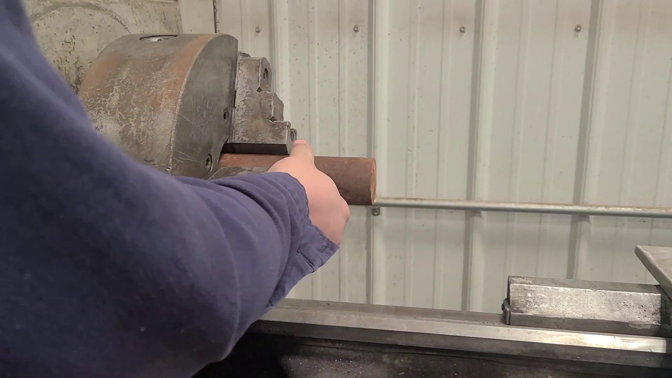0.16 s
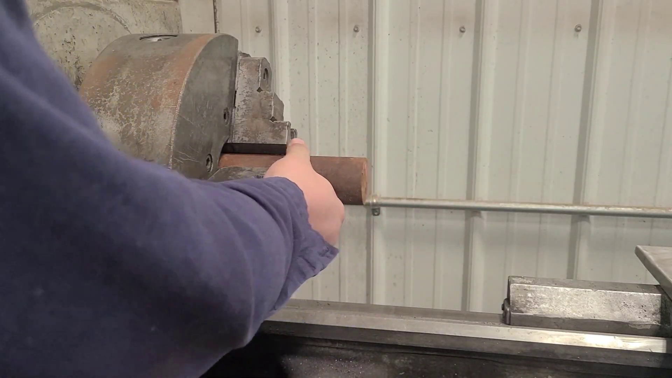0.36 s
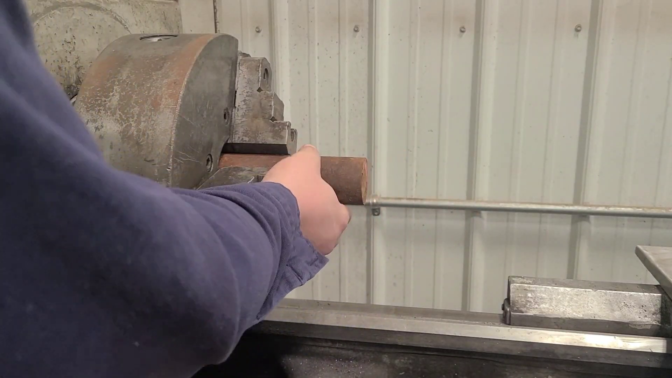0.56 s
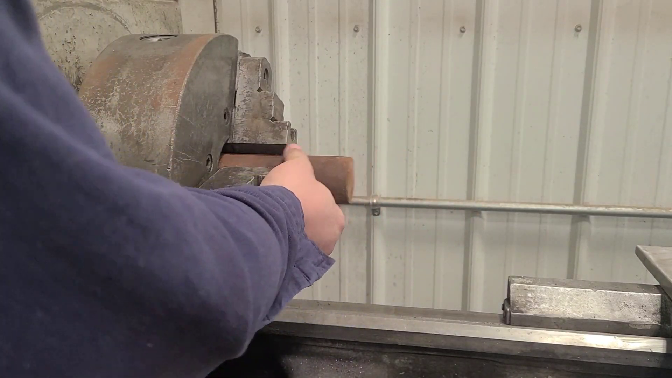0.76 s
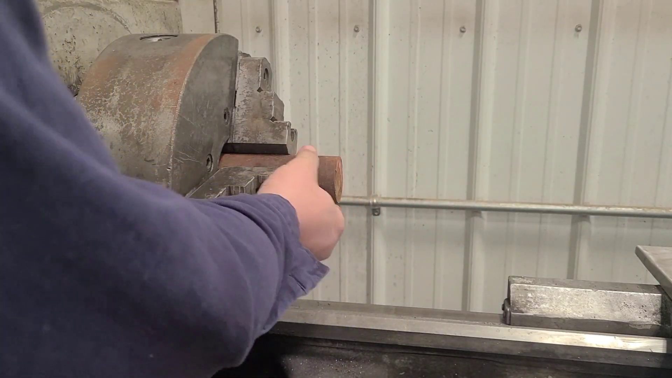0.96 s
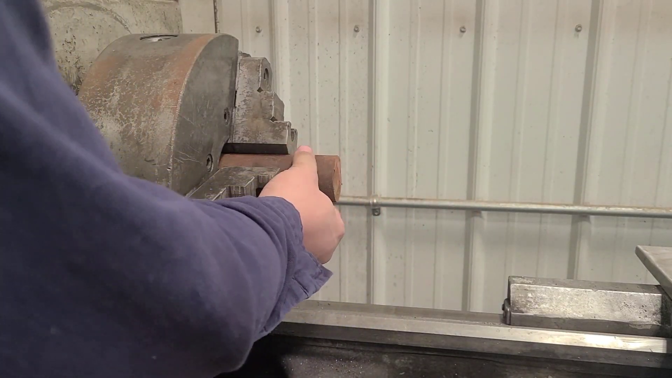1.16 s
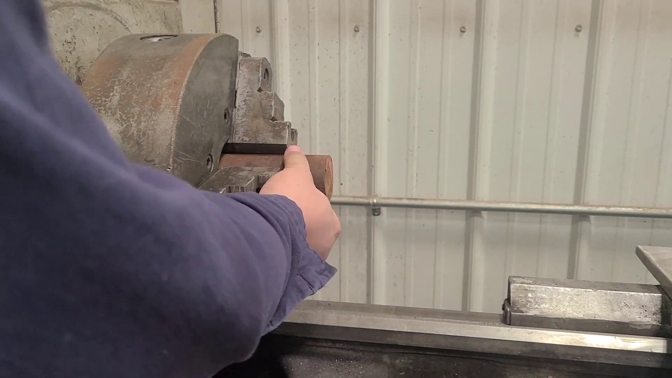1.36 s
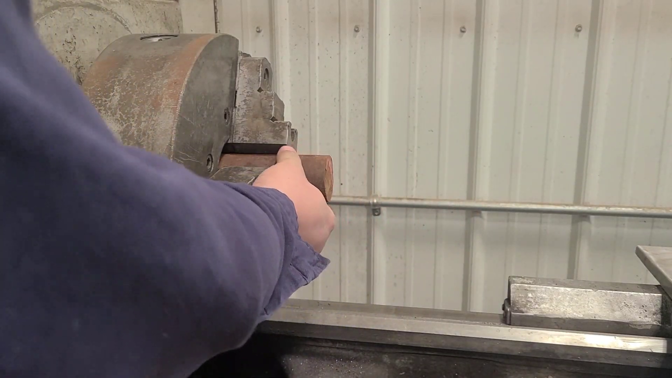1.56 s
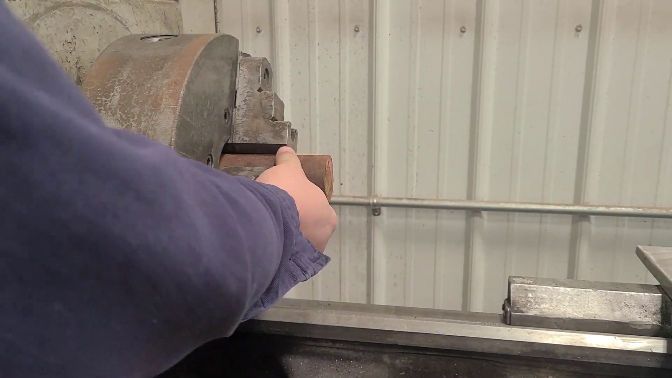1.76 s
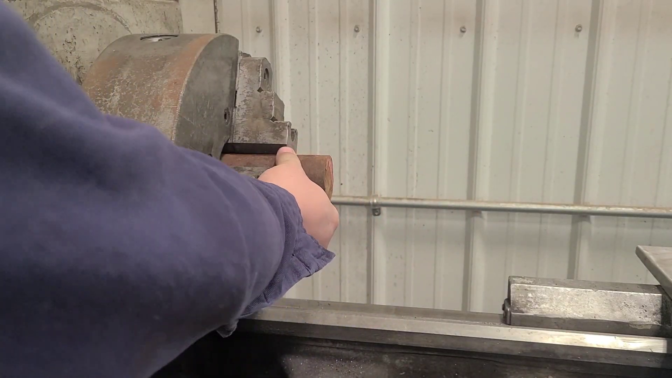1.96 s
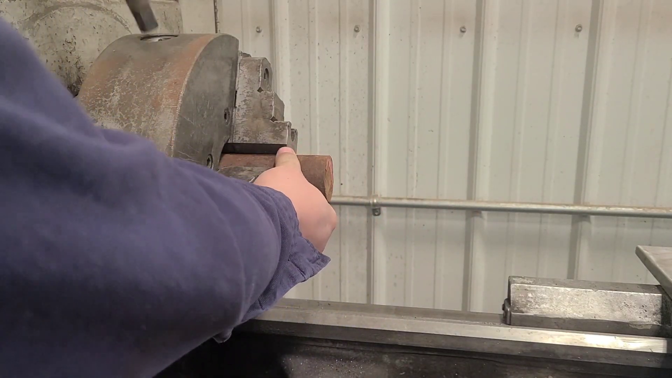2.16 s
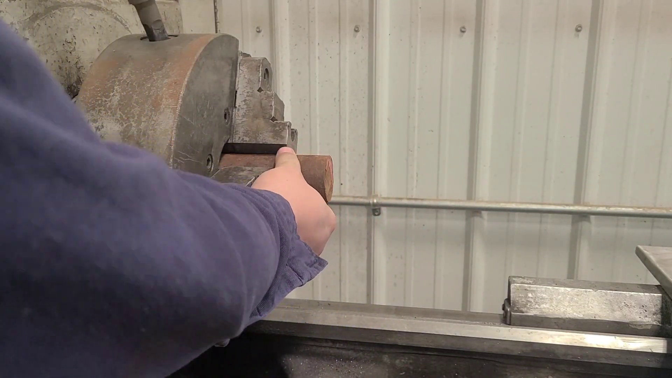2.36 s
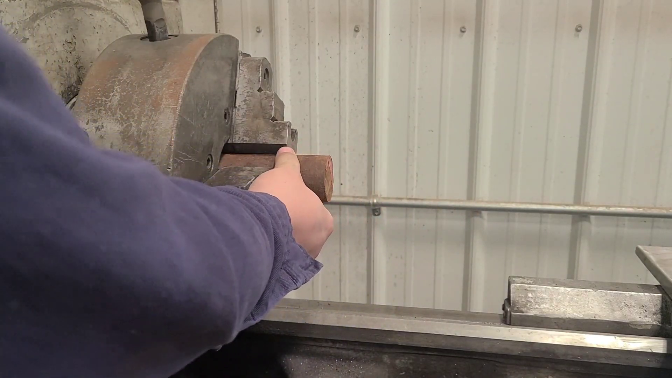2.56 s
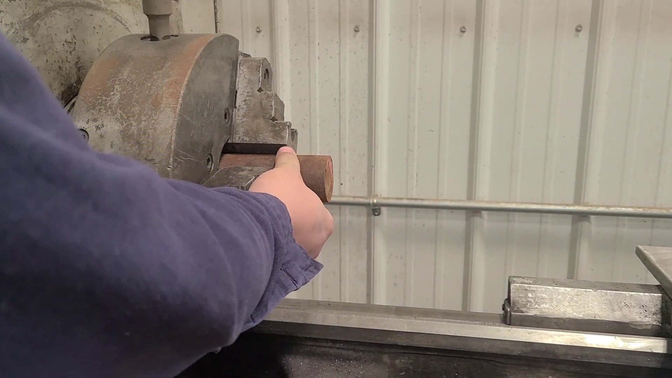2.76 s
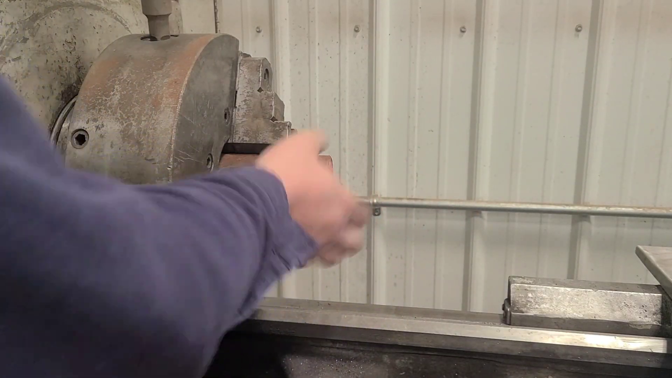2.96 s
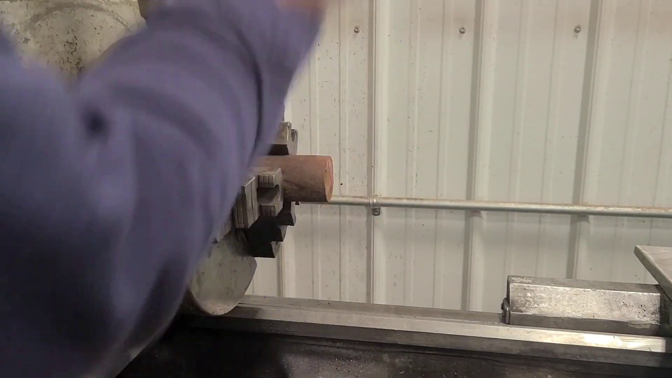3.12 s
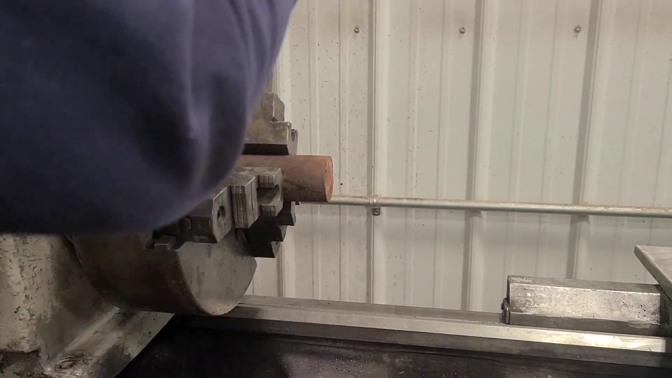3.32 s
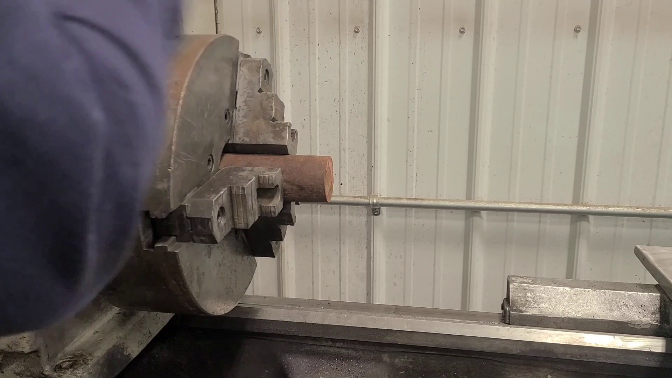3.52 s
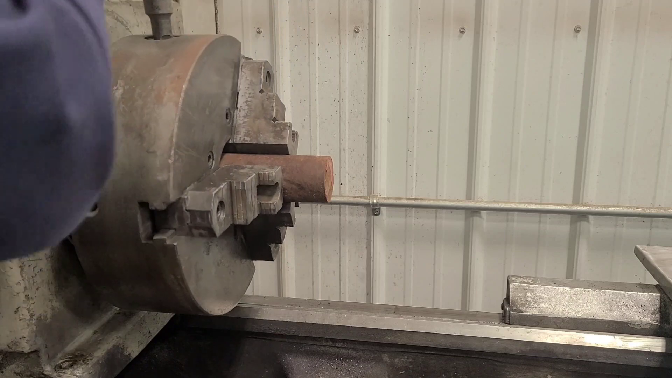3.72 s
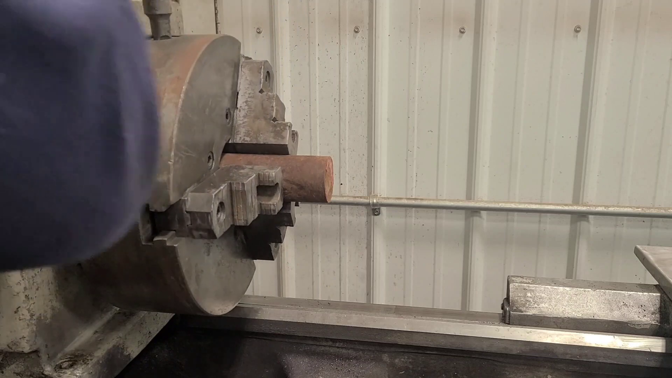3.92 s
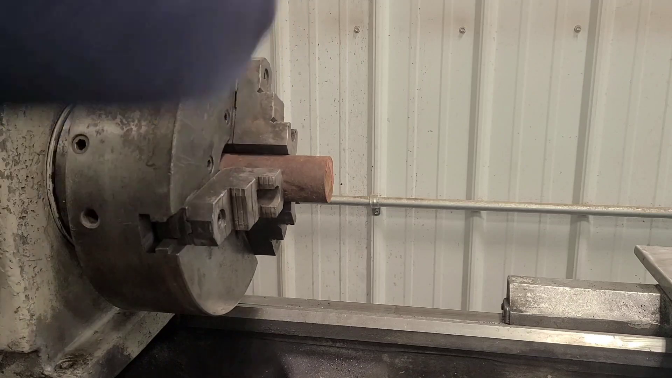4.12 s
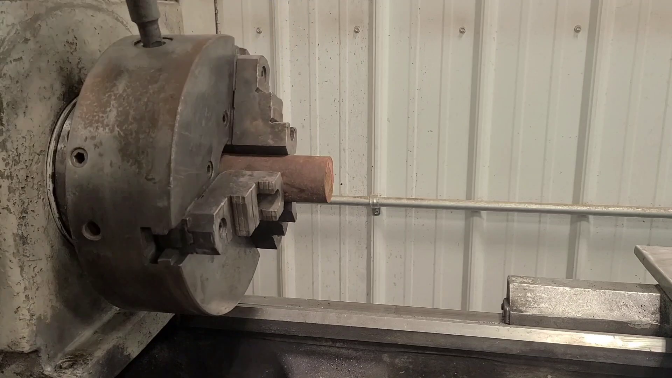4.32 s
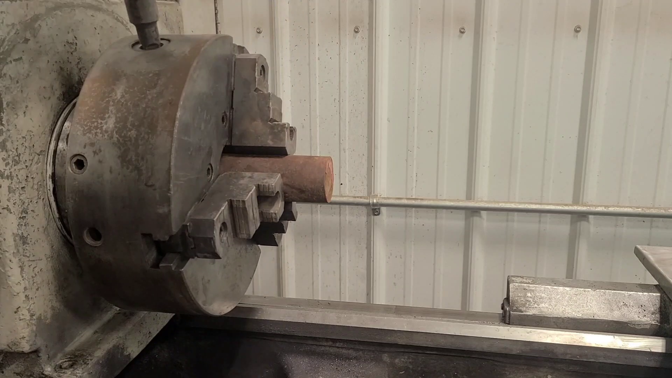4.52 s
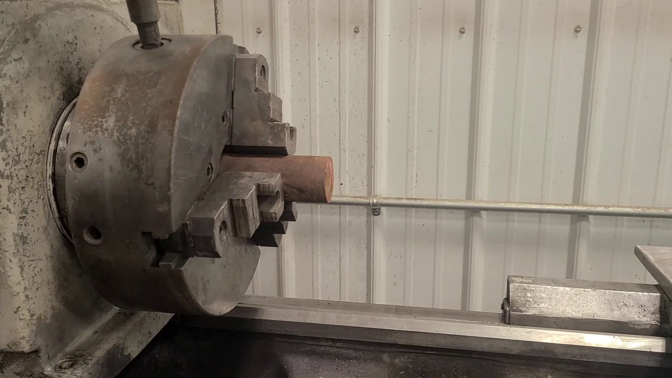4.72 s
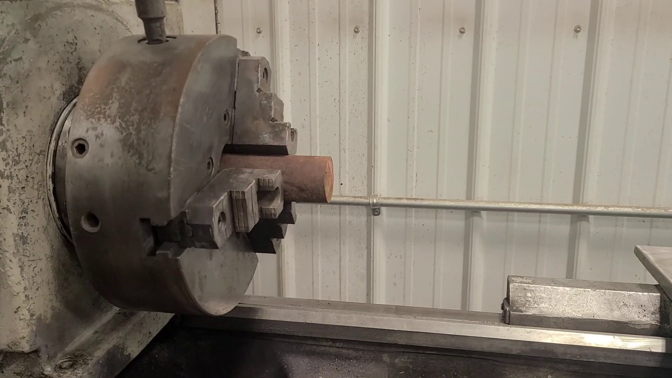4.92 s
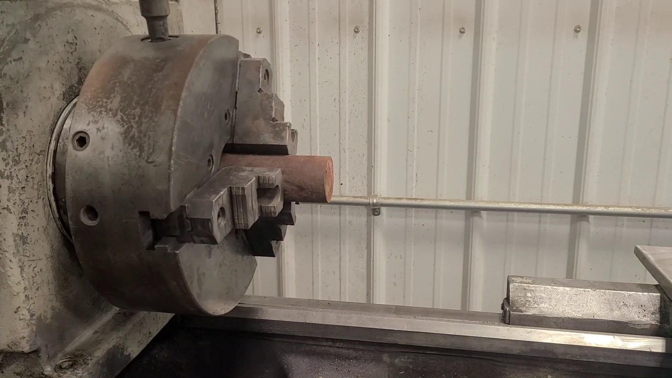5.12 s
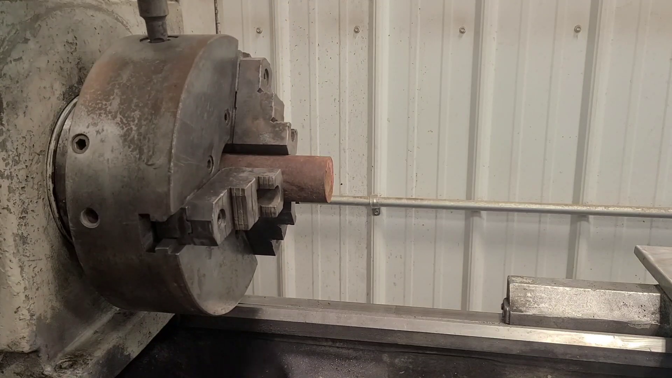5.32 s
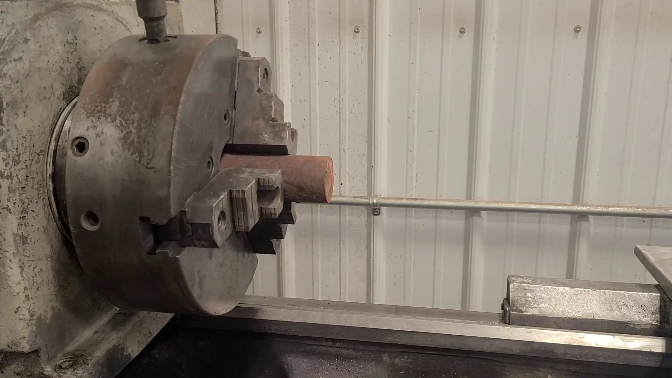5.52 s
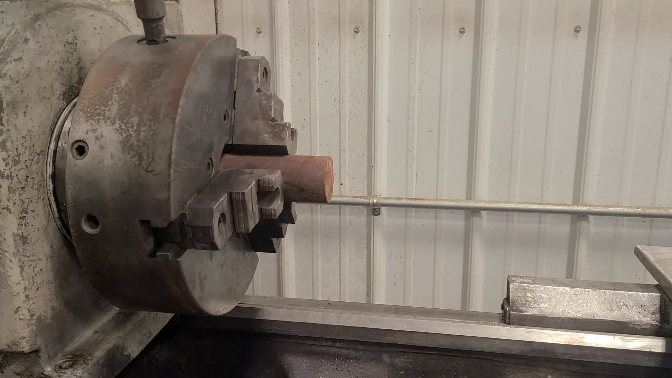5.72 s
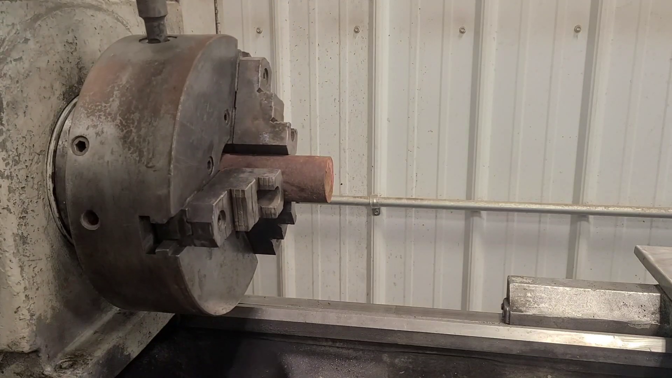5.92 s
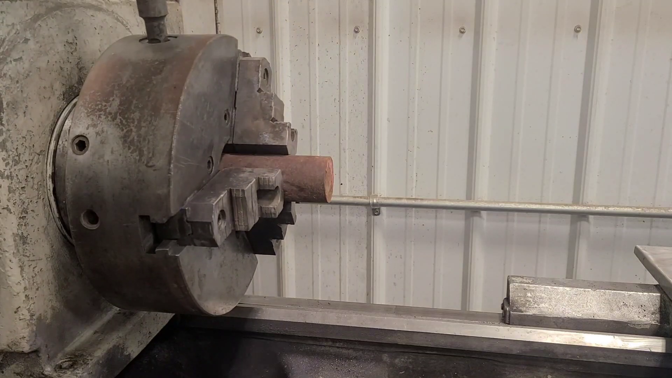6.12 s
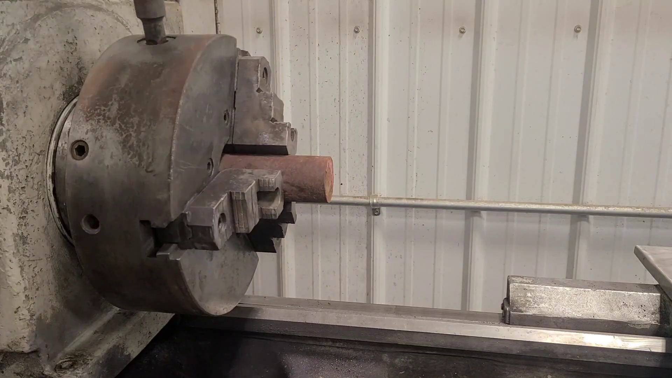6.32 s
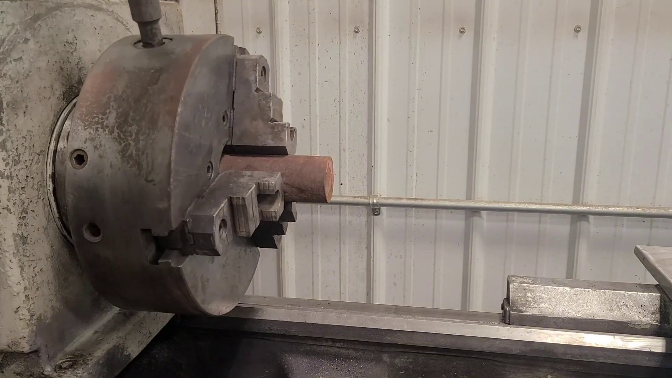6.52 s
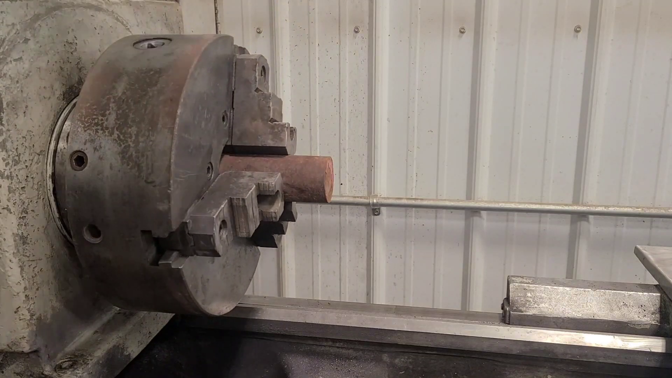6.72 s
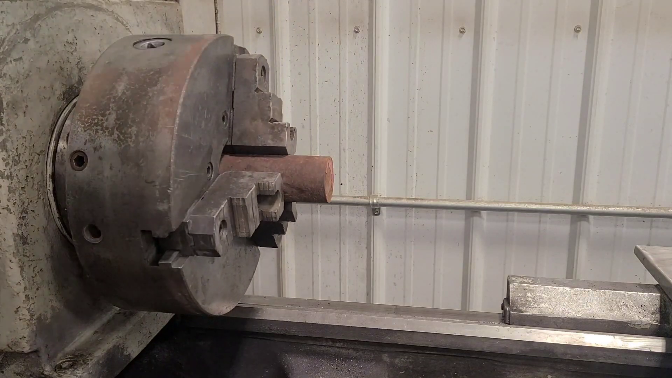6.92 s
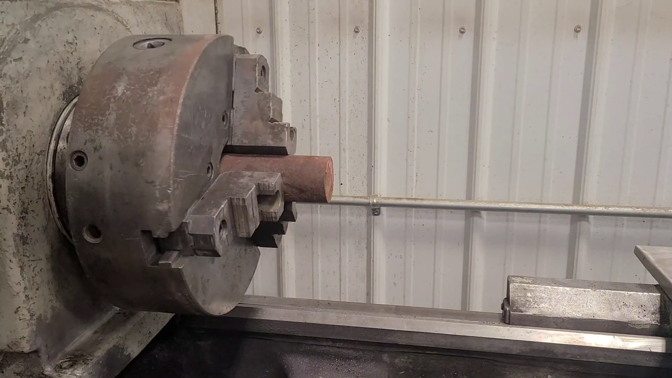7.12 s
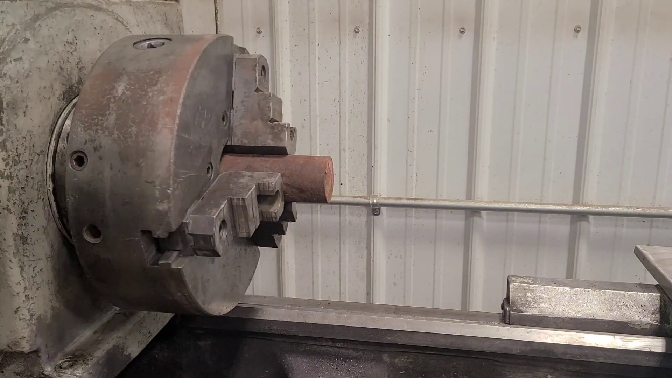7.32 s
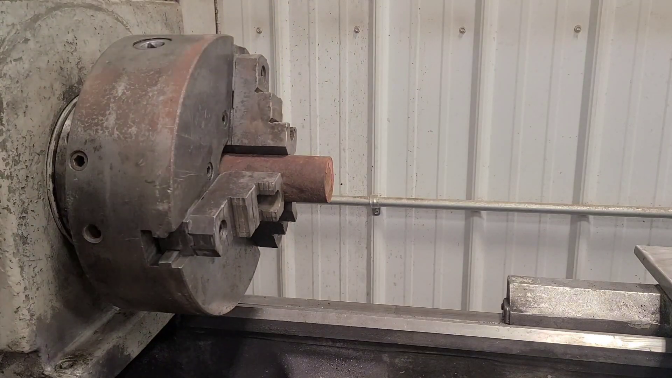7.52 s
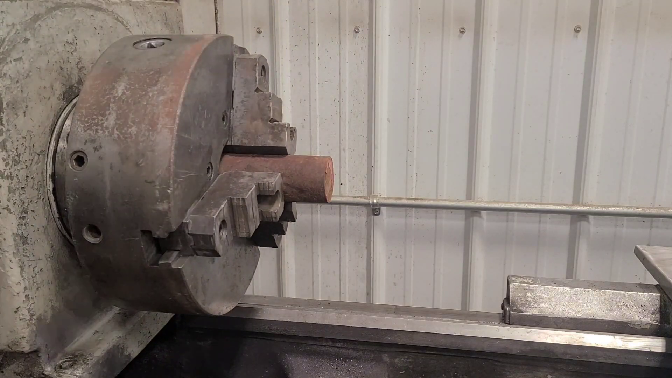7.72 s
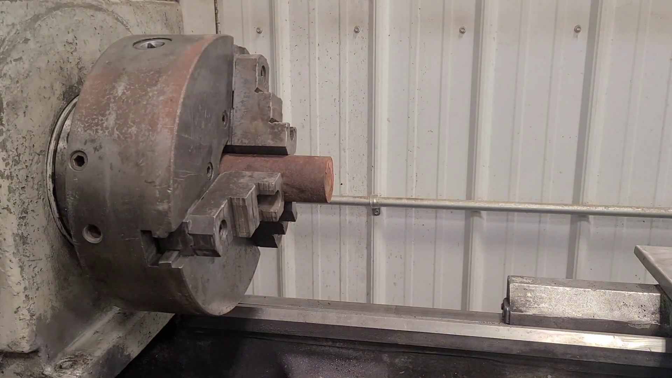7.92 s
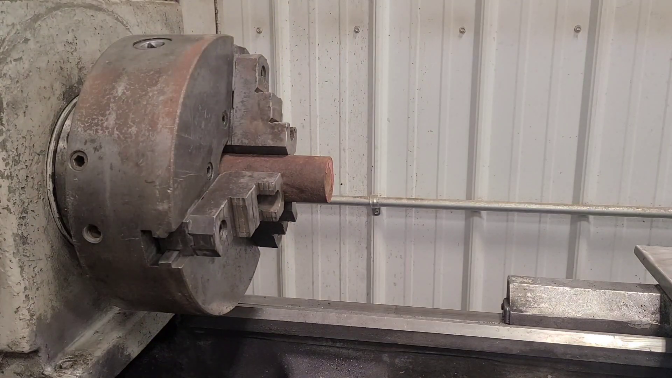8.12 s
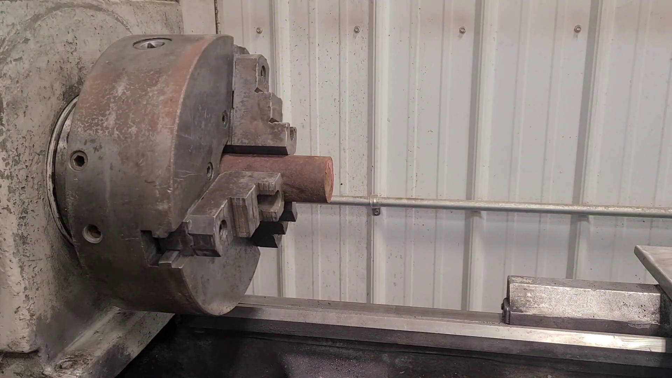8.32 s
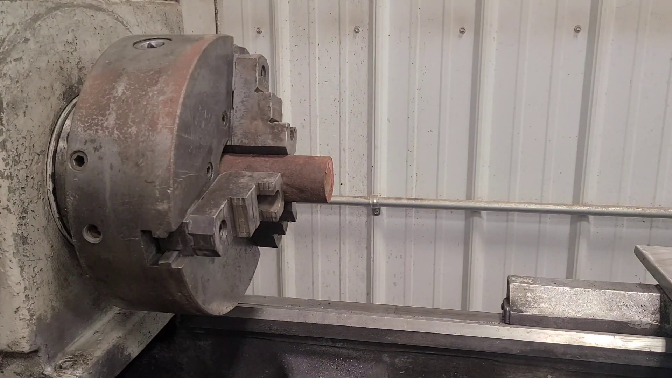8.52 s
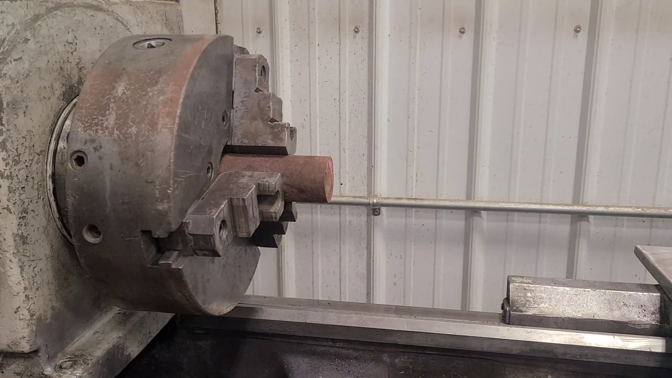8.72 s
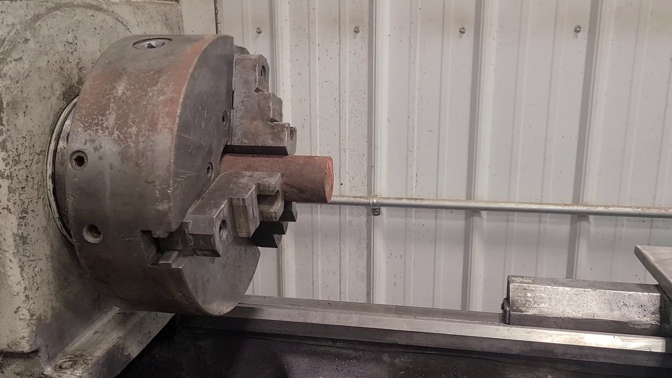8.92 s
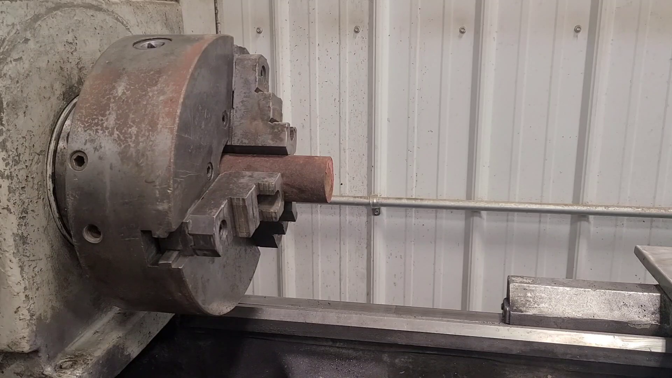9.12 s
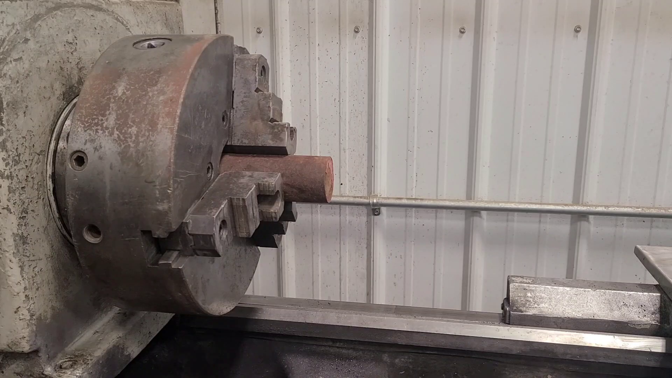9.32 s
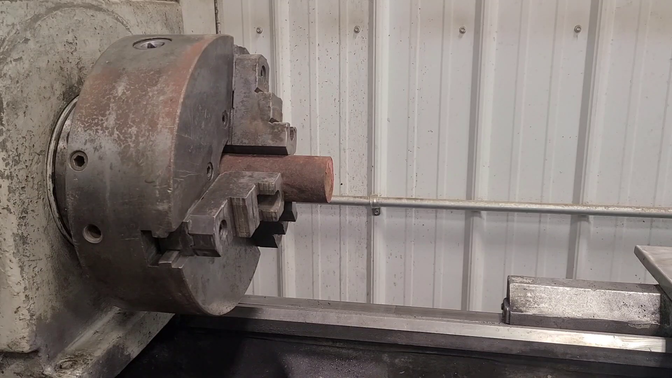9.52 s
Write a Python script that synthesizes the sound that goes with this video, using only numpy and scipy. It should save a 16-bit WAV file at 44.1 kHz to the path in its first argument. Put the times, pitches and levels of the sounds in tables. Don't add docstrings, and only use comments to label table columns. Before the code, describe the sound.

A quiet sheet-metal workshop, heard close in stereo, with faint hiss and a far low motor hum that swells and sinks. At 0.7 s a steel bar slides loosely between chuck jaws, seating with a clear ring at 0.9. A key strikes at 2.4, clinks, bounces at 2.5, and drops home at 2.9, with low booms in the machine bed. From 3.3 to 4.5 come gear clicks, soft hand knocks and sleeve rustle; a jaw clacks sharply at 4.6 and rattles briefly. Quiet knocks, dry ticks, small screw chirps and a rising fingertip drag around 5.9 lead to a hard turn at 6.5. The key scrapes out at 6.85 with a faint clink at 7.05. After near quiet, it clatters very loudly onto a tray at 8.1, bright, beating and echoing. A dull tap lands at 9.05, then soft cloth rub to the end near 9.7.

```python
import sys
import numpy as np
from scipy import signal
from scipy.fft import rfft, irfft
from scipy.io import wavfile
from scipy.ndimage import uniform_filter1d

SR = 44100
rng = np.random.default_rng(int(sys.argv[2]) if len(sys.argv) > 2 else 0)


def boost(x):
    u = np.asarray(x, float) / 20
    return 10 ** u


def pcm_store(signal):
    levels = np.round(np.clip(np.atleast_2d(signal), -1, 1) * 32767)
    wavfile.write(sys.argv[1], SR, levels.astype(np.int16).T)


N = 426447
LAG = 15
LEAD = .012

# frequency in Hz, likeness from 0 to 1.
PORT_LIKENESS = [(30, 0.86), (130, 0.81), (500, 0.64), (2000, 0.02), (8000, 0.025)]
# pitch in Hz, level in dB, t60 in s.
KEY_TIP_MODES = [(2500, -1, .03), (2750, -3, .025), (4200, 0, .07), (6250, -6, .03), (7050, 0, .08),
                 (8620, -9, .04), (9900, -20, .04)]
# frequency in Hz, level in dB per Hz.
KEY_COLOUR = [(150, -18), (300, -3), (618, -1.5), (1550, -6), (1640, -6.5), (2160, -7), (2400, -9),
              (4490, -12), (6360, -17), (12000, -38), (16000, -41.5)]


def evened(x):
    return x / np.sqrt(np.mean(x ** 2) + 1e-20)


def read(points, hz):
    f, value = np.transpose(points)
    return np.interp(np.log(hz + 1), np.log(f + 1), value)


def add(mix, s, sound):
    part = mix[:len(sound), round(s * SR):][:, :sound.shape[1]]
    part += sound[:, :part.shape[1]]


def noise(colour, size):
    hop = size // 2
    frames, hz = N // hop + 3, np.fft.rfftfreq(size, 1 / SR)[:, None]
    a, b, c, d = rng.standard_normal((frames, len(hz), 4)).T
    same = read(PORT_LIKENESS, hz)
    left, other = a + 1j * b, c + 1j * d
    right = same * left * np.exp(-2j * np.pi * hz * LAG / SR) + np.sqrt(1 - same ** 2) * other
    spectra = np.array([left, right]) * boost(read(colour, hz))
    sound = signal.istft(spectra, window="cosine", nperseg=size, noverlap=size - hop)[1]
    return evened(sound[:, :N])


def air():
    # frequency in Hz, level in dB per Hz.
    room_colour = [(12, -42), (20, -12), (53, 1), (86, 4.5), (160, -17.5), (200, -14), (244, -34.5),
                   (314, -20), (521, -21), (2660, -27.5), (6350, -31.5), (8170, -52), (11800, -34.5),
                   (15200, -39.5), (16500, -56.5)]
    # time in seconds, level in dB.
    shuffle_level = [(0, -60), (.3, -79.5), (1.1, -62.5), (1.7, -83), (3.3, -72), (5, -76.5), (6.999, -90),
                     (9.67, -88)]
    # frequency in Hz, level in dB per Hz.
    shuffle_colour = [(90, -34.5), (140, 2), (260, 13), (450, -1.5), (900, -45)]
    level_db = np.interp(np.arange(N) / SR, *np.transpose(shuffle_level))
    shuffle = boost(level_db) * noise(shuffle_colour, size=2048)
    return boost(-60.5) * noise(room_colour, size=4096) + shuffle


def hum():
    # time in seconds, level in dB.
    motor_level = [(0, -58), (1.65, -51.5), (1.95, -64), (2.1, -55), (3.64, -60.5), (3.8, -72), (5.25, -59),
                   (5.4, -90), (5.65, -58.5), (6.68, -57.5), (6.8, -87), (7.97, -67.5), (8.2, -51.5),
                   (8.33, -71.5), (9.67, -72)]
    motor_hz, width_hz, whine_hz, whine_db = 75.8, 1.7, 213, -79.5
    t = np.arange(N) / SR
    r = np.exp(-np.pi * width_hz / SR)
    draws = rng.standard_normal(N) + 1j * rng.standard_normal(N)
    fuzz = signal.lfilter([1], [1, -2 * r, r * r], draws)
    line = evened(((1 + 0.55 * fuzz / np.std(fuzz)) * np.exp(2j * np.pi * motor_hz * t)).real)
    port_db = [[-.7], [.7]]
    whine = boost(whine_db) * np.sin(2 * np.pi * whine_hz * t)
    return boost(np.interp(t, *np.transpose(motor_level)) + port_db) * line + whine


def sleeve():
    # middle in seconds, length in seconds, rub in dB, fizz in dB.
    strokes = [(0.461, 0.089, -71.5, -75.5), (1.734, 0.085, -74, -85), (2.866, 0.14, -65.5, -70),
               (3.392, 0.19, -73, -74), (3.898, 0.51, -75, -81.5), (4.156, 0.063, -63.5, -76),
               (4.435, 0.25, -65.5, -69), (4.64, 0.113, -62, -68), (4.836, .025, -83, -76),
               (5.089, 0.096, -77, -70.5), (5.253, 0.18, -81, -73.5), (5.687, 0.205, -64.5, -75),
               (6.03, 0.077, -65.5, -66.5), (6.5, 0.72, -70.5, -79), (6.884, 0.12, -54.5, -66.5),
               (6.972, 0.028, -82, -74), (7.07, 0.11, -76, -68.5), (7.366, 0.045, -103, -67.5),
               (7.466, 0.032, -101, -73), (7.819, 0.9, -77.5, -78.5), (8.064, 0.11, -62, -68.5),
               (8.842, 0.73, -69.5, -70), (9.077, 0.058, -78.5, -81), (9.405, 0.6, -72, -80.5)]
    # frequency in Hz, level in dB per Hz.
    rub_colour = [(180, -38.5), (300, -2), (351, -19), (545, -13.5), (910, -8), (1260, -7.5), (3180, -12),
                  (9000, -43.5), (11700, -65), (19800, -120)]
    # frequency in Hz, level in dB per Hz.
    fizz_colour = [(1760, -31.5), (3000, 3), (5220, 3.5), (6570, 3.5), (9200, -5), (16000, 4)]
    rest_rub_db, rest_fizz_db = -75, -100
    coarse_t = np.arange(0, N, 64) / SR
    t = np.arange(N) / SR
    s, length, rub_db, fizz_db = np.transpose(strokes)[:, :, None]
    swell = np.exp(-(2 * (coarse_t - s) / length) ** 2)
    rub = np.interp(t, coarse_t, boost(rest_rub_db) + (boost(rub_db) * swell).sum(0))
    fizz = np.interp(t, coarse_t, boost(rest_fizz_db) + (boost(fizz_db) * swell).sum(0))
    grain = evened(boost(1.6 * evened(uniform_filter1d(rng.standard_normal(N), size=150))))
    return grain * (rub * noise(rub_colour, size=1024) + 1.75 * fizz * noise(fizz_colour, size=1024))


def ring(modes, spread_db, twin_db=-40, wobble=.002):
    twin_hz = 11.0
    hz, db, t60 = np.transpose(modes)[:, :, None]
    t = np.arange(round(min(1.1 * t60.max(), .75) * SR)) / SR
    turn, blow, left, right = rng.standard_normal((len(modes), 4)).T[:, :, None]
    hold = 128
    drift = rng.standard_normal((len(modes), len(t) // hold + 1))
    drift = np.repeat(drift, hold, axis=1)[:, :len(t)]
    hz_now = hz + drift * np.sqrt(wobble * hz * SR / (2 * np.pi * hold))
    fall = boost(db + np.clip(spread_db, 0, 2) * blow - 60 * t / t60)
    tone = fall * np.exp(2j * np.pi * (np.cumsum(hz_now, axis=1) / SR + turn))
    tone *= 1 + boost(twin_db) * np.exp(2j * np.pi * twin_hz * t * (1 + .1 * blow * spread_db))
    late = np.exp(-2j * np.pi * hz * (LAG + left) / SR)
    ports = np.array([boost(1.5 * left), boost(1.5 * right) * late])
    return (ports[:, :, 0] @ tone).imag * np.minimum(t / .0015, 1)


def bed():
    # time in seconds, peak in dB.
    shoves = [(0.05, -57), (0.932, -51.5), (1.057, -57.5), (1.381, -54), (3.298, -47), (3.518, -57.5),
              (3.72, -53), (5.689, -58), (2.413, -28), (2.532, -29.5), (2.855, -35.5), (2.871, -30),
              (2.952, -24.5), (3.038, -34), (4.204, -42), (4.407, -46.5), (4.505, -42.5), (4.63, -38),
              (4.695, -46), (8.11, -42), (9.133, -55)]
    # pitch in Hz, level in dB, t60 in s.
    bed_modes = [(121, -8.5, 0.45), (135.6, -2, 0.46), (161.2, 0.9, 0.77), (201.5, -1.2, 0.66),
                 (285, -13.5, 0.23)]
    mix, push = np.zeros((2, N)), np.hanning(round(0.0029 * SR))[None]
    for s, peak_db in shoves:
        boom = signal.fftconvolve(ring(bed_modes, spread_db=0.5, wobble=0.018), push, axes=1)
        boom = 0.42 * boom.mean(0) + .5 * boom
        add(mix, s, boost(peak_db) * boom / abs(boom).max())
    return mix


def crunch(colour, chatter, wash_db, wash_t60):
    t = np.arange(round(.35 * SR)) / SR - LEAD
    a, b = rng.standard_normal((2, len(t) + LAG))
    pair = np.array([a[LAG:], .6 * a[:-LAG] + np.sqrt(1 - .6 ** 2) * b[LAG:]])
    pair = irfft(rfft(pair) * boost(read(colour, np.fft.rfftfreq(len(t), 1 / SR))), len(t))
    after = np.maximum(t, 0)
    shape = boost(-60 * after / chatter) + boost(wash_db - 60 * after / wash_t60)
    swell_in = boost(-19) * (1 + np.minimum(t, 0) / LEAD) ** 2
    rise = np.clip(t / min(0.045 * chatter, .003), swell_in, 1)
    return pair * shape * rise * (1 - after / t[-1])


def strike(rung, crunched, ring_db, peak_db, bands_db, pan_db):
    head = round(.03 * SR)
    sound = np.zeros((3, max(rung.shape[1] + round(LEAD * SR) + 1, crunched.shape[1])))
    ring_gain = boost(ring_db + np.array([[0], [0], [-4]]))
    add(sound, LEAD, ring_gain * rung[[0, 1, 0]] / np.linalg.norm(rung[:, :head]))
    add(sound, 0, crunched[[0, 1, 0]] / np.linalg.norm(crunched[:, :head]))
    total = np.zeros_like(sound)
    low_lean_db = -1.6
    for edges, lean_db, sign, db in zip([(200, 1300), (1300, 4500), (4500, 17000)],
                                        (low_lean_db, pan_db, pan_db), (1, -1, 1), bands_db):
        band = signal.butter(2, edges, "bandpass", fs=SR, output="sos")
        part = signal.sosfilt(band, sound) * boost(lean_db * np.array([[.5], [-.5], [0]]))
        total += sign * boost(db) * part / np.linalg.norm(part[:2, :head])
    return boost(peak_db) * total / abs(total[:2]).max()


def knocks():
    # time in seconds, peak in dB, ring in Hz,
    # brightness in dB.
    hand_knocks = [(0.43, -49.5, 413, -30), (1.047, -45, 290, -49), (2.535, -33.5, 402, -40),
                   (2.959, -35, 345, -42), (3.05, -44, 327, -40), (3.399, -44.5, 305, -47),
                   (3.886, -47, 430, -52), (3.893, -38, 420, -38), (3.917, -33, 733, -15.5),
                   (3.92, -43, 1560, -5), (3.939, -42, 900, -13), (4.035, -43.5, 400, -17),
                   (4.125, -38, 1460, -6), (4.165, -49, 2230, 5), (4.197, -42, 497, -15),
                   (4.352, -48, 604, -14), (4.42, -50, 700, -15), (4.406, -48, 348, -47),
                   (4.501, -49.5, 930, -23), (4.571, -54, 2400, -10), (4.361, -45.5, 308, -42),
                   (4.492, -49.5, 299, -28), (4.73, -44.5, 395, -49), (4.928, -45, 411, -52),
                   (5.035, -44, 404, -21), (5.417, -51.5, 297, -25), (5.689, -36.5, 446, -17),
                   (5.701, -44, 1100, -8), (5.762, -44, 403, -17), (5.719, -38, 302, -26),
                   (6.068, -51.5, 300, -37), (6.469, -47.5, 413, -45), (6.49, -49.5, 348, -32),
                   (6.56, -49, 2170, -14), (6.875, -46, 930, -16), (6.918, -45, 475, -30),
                   (8.056, -25, 612, -18), (9.309, -51, 265, -11)]
    # time in seconds, peak in dB, brightness in dB.
    gear_clicks = [
        (0.899, -41, -13),
        (2.85, -35.5, -36),
        (3.267, -37.5, -18),
        (3.521, -43.5, -12),
        (3.833, -44, -45),
        (4.027, -38.5, -33),
    ]
    # time in seconds, peak in dB, brightness in dB.
    screw_chirps = [
        (4.127, -49, -5),
        (4.148, -50.5, -8),
        (5.777, -47, -6),
        (6.0, -59, -2),
        (6.543, -40, -17),
        (6.579, -53, -3),
    ]
    # frequency in Hz, level in dB per Hz.
    hand_colour = [(120, -43.5), (200, -8), (298, -2), (750, -13), (1210, -20.5), (1510, -13.5),
                   (1640, -19.5), (9000, -60), (11700, -67.5), (19800, -120)]
    gear_hz, screw_hz = 1018, 2290
    clicks = [(s, db, gear_hz, bright_db) for s, db, bright_db in gear_clicks]
    clicks += [(s, db, screw_hz, bright_db) for s, db, bright_db in screw_chirps]
    mix = np.zeros((3, N))
    for s, peak_db, hz, bright_db in hand_knocks + clicks:
        chatter = 0.071 * 350 / hz
        t60, ring_db = (0.075, 2.8) if hz > 850 else (0.12, -0.7)
        rung = ring([(hz, 0, t60)], spread_db=-11, wobble=0.026)
        crunched = crunch(hand_colour, chatter, wash_db=0, wash_t60=0.31)
        bands_db = (-10.5, bright_db, bright_db - 29.5)
        add(mix, s - LEAD, strike(rung, crunched, ring_db, peak_db, bands_db, pan_db=2.5))
    return mix


def shop(x):
    # frequency in Hz, t60 in s.
    shop_t60 = [(150, 1.07), (500, 0.36), (1500, 0.7), (3000, 1.11), (4500, 0.9), (8000, 0.52),
                (14000, 0.59)]
    taps = np.zeros((2, SR))
    at = np.arange(300, SR - 20, 20) + rng.integers(0, 20, (2, (SR - 301) // 20))
    np.put_along_axis(taps, at, rng.choice([-1., 1.], at.shape), 1)
    hz, t, z = signal.stft(taps, SR, nperseg=256)
    hz = hz[:, None]
    same = read(PORT_LIKENESS, hz) ** 2
    z[1] = same * z[0] * np.exp(-2j * np.pi * hz * LAG / SR) + np.sqrt(1 - same ** 2) * z[1]
    tail = signal.istft(z * boost(-60 * t / read(shop_t60, hz)), SR, nperseg=256)[1]
    return signal.fftconvolve(x[None], tail / np.linalg.norm(tail[0]), axes=1)[:, :N]


def blows(table, modes, colour, ring_db, spread_db, wash_db, wash_t60, pan_db, **beat):
    mix = np.zeros((3, N))
    for s, peak_db, low_db, high_db, chatter in table:
        rung = ring(modes, spread_db, **beat)
        crunched = crunch(colour, chatter, wash_db, wash_t60)
        add(mix, s - LEAD, strike(rung, crunched, ring_db, peak_db, (low_db, 0, high_db), pan_db))
    return mix


def lasting(pitches, levels_db, t60):
    return [(hz, db, read(t60, hz)) for hz, db in zip(pitches, levels_db)]


def bar():
    # time in seconds, peak in dB, low and high band in dB re the middle, contact chatter in s.
    slides = [
        (0.719, -25.5, 7.2, -6, 0.47),
        (0.75, -23.5, 1.1, -6.5, 0.023),
        (0.949, -22.5, 3.8, -3, 0.019),
    ]
    # time in seconds, peak in dB, low and high band in dB re the middle, contact chatter in s.
    seats = [
        (0.924, -15.5, 3.2, -7.5, 0.039),
    ]
    loose_hz = [620, 1900, 2410, 2805, 3187, 3435, 3680, 4107, 4686, 5362, 6060, 6530, 7806, 8791, 9970,
                11965]
    loose_db = [-7.5, -13, -15, -17, -10, -8, -12, -5, 0, -27, 0.5, -3, -4, -26, -7, -17]
    # frequency in Hz, t60 of the loose bar in s.
    loose_t60 = [(600, 0.2), (3000, .3), (12000, .2)]
    seated_hz = [520, 1534, 1701, 2234, 2541, 2805, 2993, 3535, 4081, 4592, 4877, 4936, 5760, 6390, 6498,
                 6648, 6848, 7682, 8100, 9749, 10172, 11657, 12441, 13878, 14680]
    seated_db = [-4, -25, -16, -25, -10, 2.5, -25, -15, -10, -27, -25, -6, -26, -8, -7, -21, -23, 0, -12,
                 -6, -5, -9, -15, -18, -19]
    # frequency in Hz, t60 of the seated bar in s.
    seated_t60 = [(520, 0.076), (1500, 0.27), (2800, .6), (5000, 0.58), (8000, 0.48), (14000, 0.19)]
    # frequency in Hz, level in dB per Hz.
    bar_colour = [(120, -59), (200, -10), (735, -4.5), (836, -6), (5730, -4.5), (6280, -8), (9930, -16),
                  (11100, -37), (12400, -4), (16000, -87)]
    loose = blows(slides, lasting(loose_hz, loose_db, loose_t60), bar_colour, ring_db=-0.5, spread_db=5.0,
                  wash_db=0, wash_t60=0.29, pan_db=4.5, twin_db=-5)
    seated = blows(seats, lasting(seated_hz, seated_db, seated_t60), bar_colour, ring_db=6.0, spread_db=2.5,
                   wash_db=-5.0, wash_t60=0.24, pan_db=4.5, twin_db=-8, wobble=.0008)
    return loose + seated


def damped(peaks):
    return [(hz, db, 2.2 / width) for hz, width, db in peaks]


def key():
    # time in seconds, peak in dB, low and high band in dB re the middle, chatter in s.
    hits = [
        (2.397, -21.5, 8, -16, 0.021),
        (2.404, -9.5, -2, -13.5, 0.0059),
        (2.413, -22, 8, -15, 0.072),
    ]
    bounces = [
        (2.511, -27, -13, -4, 0.018),
        (2.519, -12.5, -8, -4, 0.01),
        (2.526, -14.5, -4.5, -6.5, 0.02),
    ]
    seats = [
        (2.935, -16.5, 5, 2, 0.0073),
        (2.944, -14, -4.5, 0.5, 0.019),
        (3.078, -44, -4.5, -19, 0.022),
    ]
    clacks = [
        (4.618, -18.5, -6.5, -5, 0.039),
        (4.63, -34, 10, -26, 0.081),
        (4.647, -37, 12, -15, 0.032),
        (4.665, -43, 9, -12, 0.03),
        (4.695, -45.5, 2, -20, 0.044),
    ]
    clinks = [
        (2.458, -16, 1.5, 1, 0.012),
        (2.463, -20, -9, -3, 0.03),
        (6.846, -27.5, -10.5, -25, 0.037),
    ]
    # pitch in Hz, width in Hz, level in dB.
    landing = [(468, 17, -15), (623, 90, -15), (1702, 22, -9), (2440, 35.4, -9.5), (2750, 190, 6),
               (4040, 44, -13.5), (4350, 150, -4), (4800, 40, -15.5), (5640, 50, -21), (6080, 150, -9.5),
               (6470, 42, -14.5), (6700, 60, -14.5), (8370, 40, -30), (9900, 160, -15)]
    tilted = [(1090, 95, -3), (2370, 60, -3), (2550, 40, -6), (3710, 50, -7), (4250, 60, -5),
              (4840, 50, -8), (6050, 90, 0), (8690, 50, -16), (9700, 60, -12)]
    held = [(2499, 20, 4), (2650, 14, -0.5), (4184, 56, 3), (5600, 91, 2), (6210, 37, 2), (6480, 34, -2),
            (7070, 37, 1), (8480, 50, -18)]
    jaw = [(745, 30, -9), (1061, 25, -0.5), (2100, 35, -7), (2210, 67, 1), (2710, 30, -3), (2957, 83, 0.5),
           (4360, 47, -4), (4700, 140, 1), (5200, 130, -3), (6420, 95, 7), (9100, 200, -17)]
    mix = np.zeros((3, N))
    for table, peaks, ring_db in ((hits, landing, 3), (bounces, tilted, -1), (seats, held, 0.7),
                                  (clacks, jaw, 1.5)):
        mix += blows(table, damped(peaks), KEY_COLOUR, ring_db, spread_db=3.0, wash_db=-13.0,
                     wash_t60=0.25, pan_db=7, wobble=0.0036)
    mix += blows(clinks, KEY_TIP_MODES, KEY_COLOUR, ring_db=3.5, spread_db=39, wash_db=0,
                 wash_t60=0.26, pan_db=7, wobble=0.0044)
    return mix


def scrapes():
    # start in seconds, end in seconds, peak in dB.
    rubs = [
        (2.8, 2.85, -43),
        (2.495, 2.515, -29),
        (6.8, 6.851, -36),
    ]
    swell_db = 22
    mix = np.zeros((2, N))
    for start, end, db in rubs:
        t = np.arange(start, end, 1 / SR)
        rub = rng.standard_normal((1, len(t))) * boost(swell_db * (t - end) / (end - start))
        sound = signal.fftconvolve(ring(KEY_TIP_MODES, spread_db=0, wobble=.01), rub, axes=1)
        add(mix, start, boost(db) * sound / abs(sound).max())
    return mix


def ticks():
    # time in seconds, peak in dB, low and high band in dB re the middle.
    dry_ticks = [(3.1, -54, -20, 12), (4.298, -50, -3, 17), (5.382, -49, -24, -24), (5.651, -49, -20, -3),
                 (5.728, -44, -20, -10), (5.828, -51, -20, -11), (5.919, -46, -21, 6),
                 (6.057, -34, -20, -9), (6.234, -48, -15, -19), (6.348, -46.5, -8, -17),
                 (6.366, -44, -22.5, 0), (6.453, -46, -20, -2), (8.976, -41.5, 23, -9.5),
                 (9.001, -50, 17, -15), (9.025, -47, 6, -17), (9.055, -18.5, -10, -35),
                 (9.137, -34.5, 12.5, -25)]
    chatter_s = 0.0067
    return blows([(*row, chatter_s) for row in dry_ticks], KEY_TIP_MODES, KEY_COLOUR, ring_db=-29,
                 spread_db=12.5, wash_db=-14.0, wash_t60=0.18, pan_db=2.5)


def drag():
    # time in seconds, resonance in Hz, level in dB.
    path = [
        (5.82, 2510, -70.5),
        (5.95, 2957, -60.5),
        (6.051, 3540, -63),
    ]
    s, hz, db = np.transpose(path)
    t = np.arange(s[0], s[-1], 1 / SR)
    r = np.exp(-np.pi * 800. / SR)
    draws = rng.standard_normal((2, len(t))) + 1j * rng.standard_normal((2, len(t)))
    slow = signal.lfilter([1], [1, -r], draws)
    sound = evened((slow * np.exp(2j * np.pi * np.cumsum(np.interp(t, s, hz)) / SR)).real)
    mix = np.zeros((2, N))
    add(mix, s[0], sound * boost(np.interp(t, s, db)) * signal.windows.tukey(len(t), .2))
    clink_s, clink_db, clink_hz, clink_t60 = 7.048, -56, 6480, .16
    add(mix, clink_s, boost(clink_db) * ring([(clink_hz, 0, clink_t60)], spread_db=5))
    return mix


def tray():
    # time in seconds, peak in dB, low and high band in dB re the middle, contact chatter in s.
    clatter = [(8.055, -23, 5.5, -2, 0.45), (8.098, -21.5, 1, 8, 0.063), (8.107, -17.5, 0.5, 13, 0.034),
               (8.1113, 0.5, 6.5, 7.5, 0.024), (8.116, -3, 8, 11.5, 0.044), (8.124, -10, 3, 5, 0.012),
               (8.135, -4.5, 1.5, 9, 0.054), (8.147, -2.5, -5, 13, 0.041), (8.155, -14, 4, -7, 0.032),
               (8.1607, 0, -2.5, 1, 0.047), (8.168, -9, -5, 9, 0.11)]
    tray_hz = [1570, 2135, 2358, 2490, 2670, 3175, 3310, 3500, 4170, 4490, 5432, 5620, 5948, 6100, 6478,
               6869, 7035, 7704, 8060, 8240, 8893, 9100, 9432, 9960, 10258, 11150, 11520, 11550, 11928,
               11960, 12139, 12441, 12828, 13787, 14165, 14680, 15155, 15322]
    tray_db = [-52, -60, -61.5, -58.5, -60, -53, -60.5, -59.5, -63, -58.5, -63, -61.5, -49.5, -56, -58.5,
               -58.5, -58.5, -43.5, -53.5, -56, -54.5, -52.5, -59, -59, -52, -55.5, -46.5, -44, -48, -51.5,
               -57, -55, -44.5, -49, -44.5, -54.5, -49, -45.5]
    tray_t60 = [.6, .7, .6, 0.62, 0.69, 0.31, 0.59, .8, .6, 0.6, .6, 0.79, .55, 0.83, .8, 0.24, .45, 0.33,
                .3, .4, 0.44, 0.39, .3, 0.24, .35, .06, .24, 0.22, .22, 0.24, .3, .35, .2, 0.28, 0.27, 0.32,
                .35, .3]
    # frequency in Hz, level in dB per Hz.
    tray_colour = [(88, -52), (150, -28), (469, 1), (2310, -3.5), (3160, -3), (3770, -15.5), (4500, -2.5),
                   (5100, -15.5), (5930, -5), (10800, -23.5), (11800, -5), (15600, -31.5), (16500, -59.5)]
    return blows(clatter, list(zip(tray_hz, tray_db, tray_t60)), tray_colour, ring_db=-2.6, spread_db=4.0,
                 wash_db=-7.5, wash_t60=0.25, pan_db=4.5, twin_db=-6.5, wobble=0.0023)


def scene():
    near = np.zeros((2, N))
    echo = np.zeros(N)
    for sound, echo_db in ((bar(), -12.5), (key(), -17), (tray(), -12.5), (ticks() + knocks(), -17)):
        near += sound[:2]
        echo += boost(echo_db) * sound[2]
    return near + shop(echo) + bed() + hum() + sleeve() + drag() + scrapes() + air()


def band_limit(x):
    return signal.sosfilt(signal.butter(12, 15850, fs=SR, output="sos"), x)


def record(dry):
    return band_limit(np.tanh(dry))


dry = scene()
out = record(dry)
pcm_store(out)
```